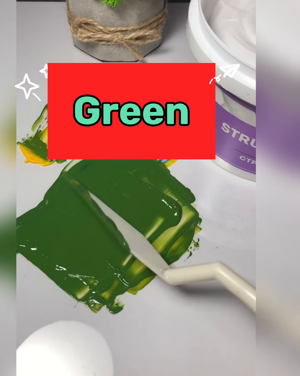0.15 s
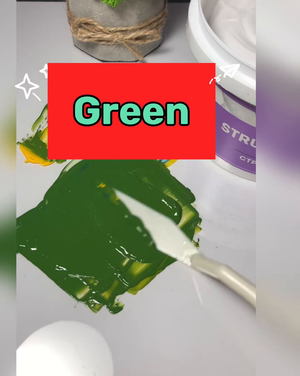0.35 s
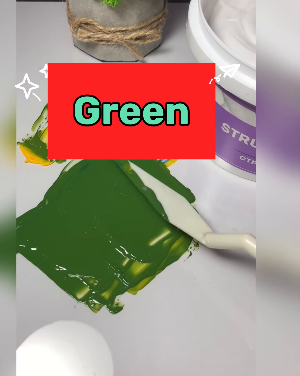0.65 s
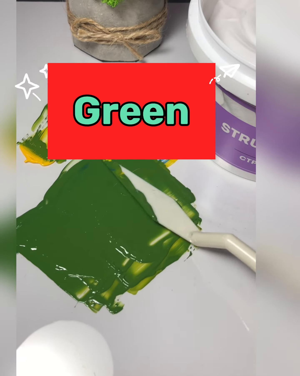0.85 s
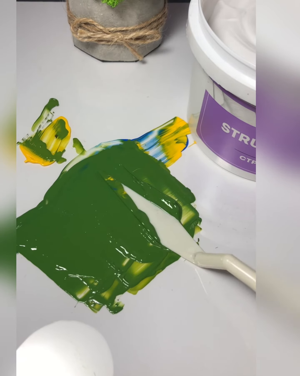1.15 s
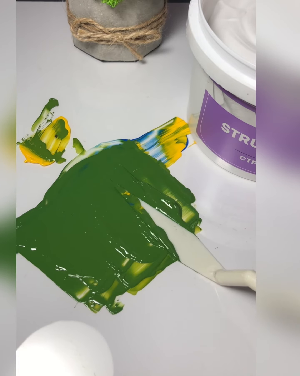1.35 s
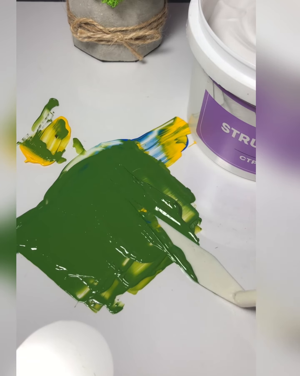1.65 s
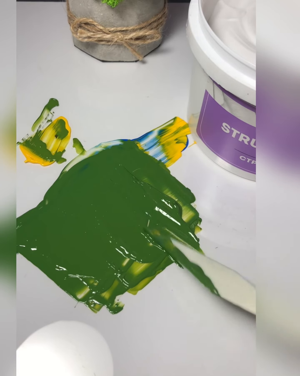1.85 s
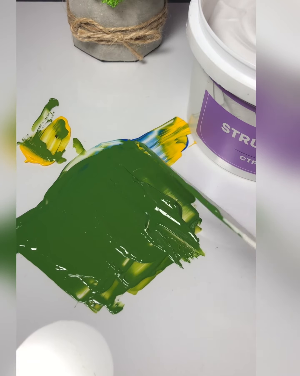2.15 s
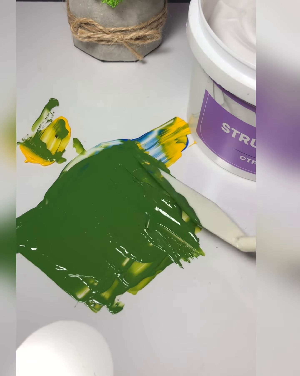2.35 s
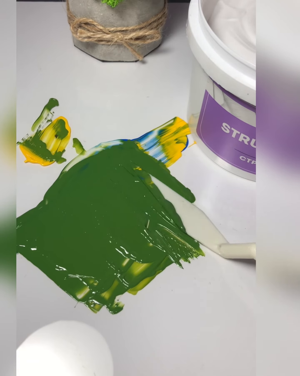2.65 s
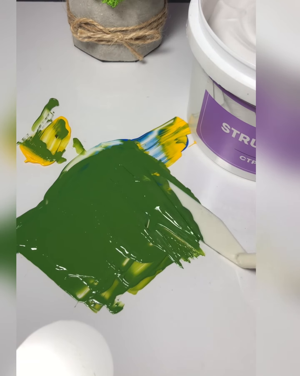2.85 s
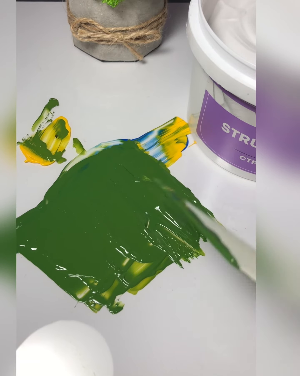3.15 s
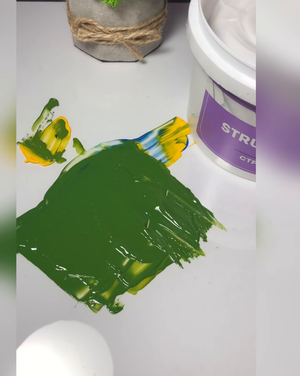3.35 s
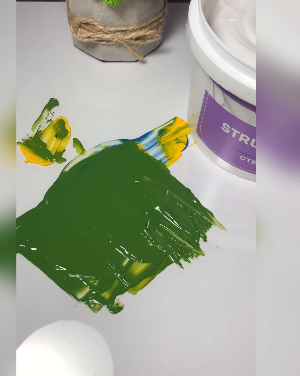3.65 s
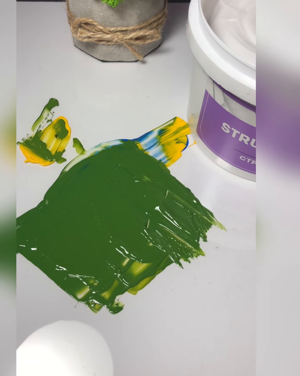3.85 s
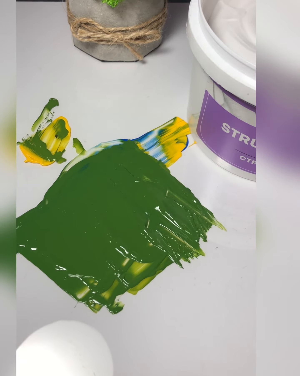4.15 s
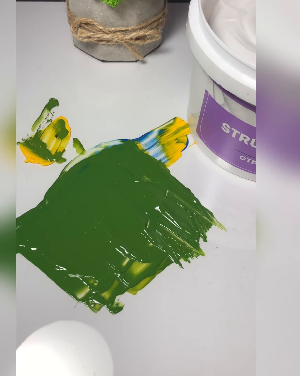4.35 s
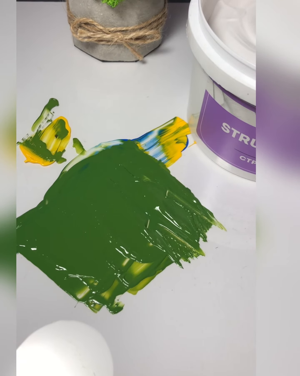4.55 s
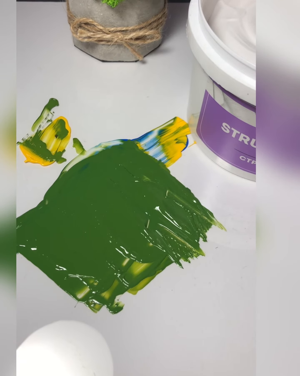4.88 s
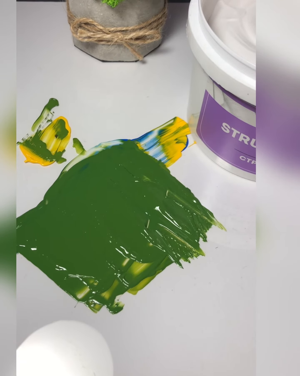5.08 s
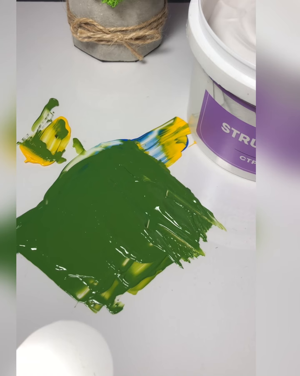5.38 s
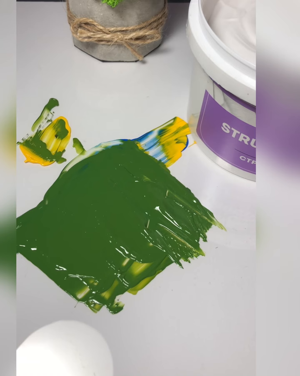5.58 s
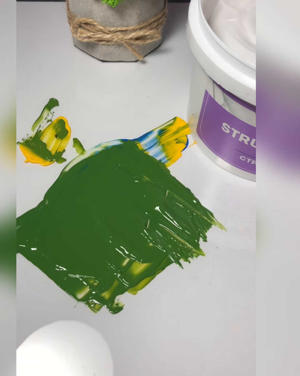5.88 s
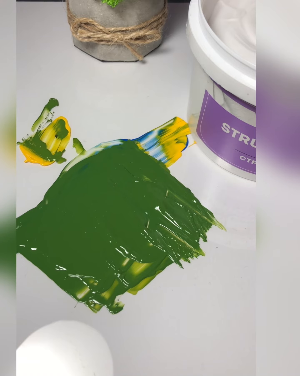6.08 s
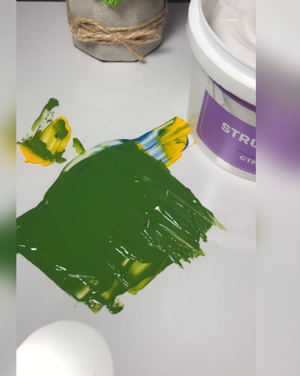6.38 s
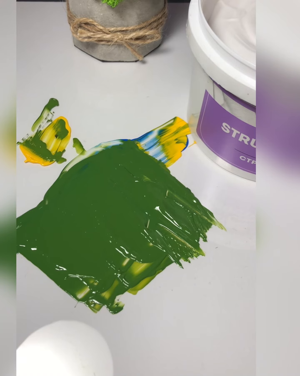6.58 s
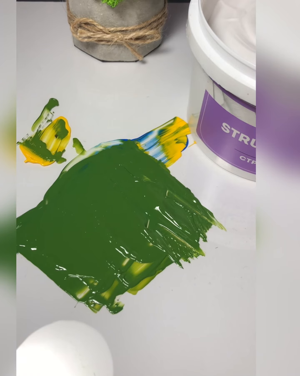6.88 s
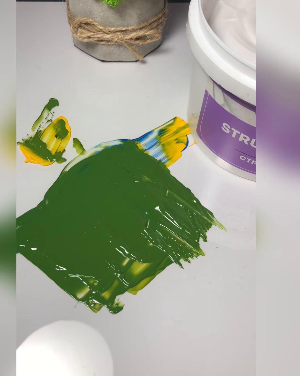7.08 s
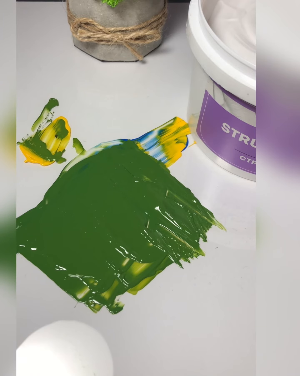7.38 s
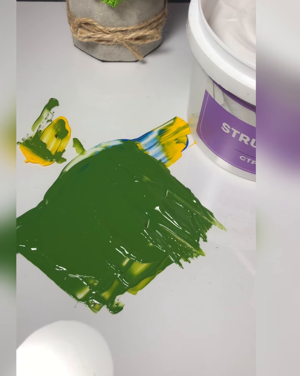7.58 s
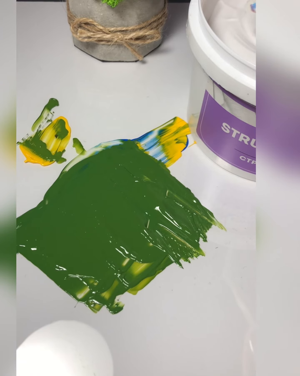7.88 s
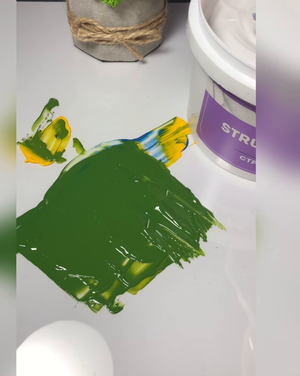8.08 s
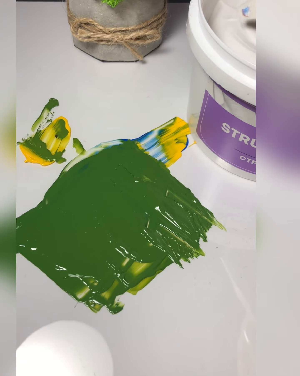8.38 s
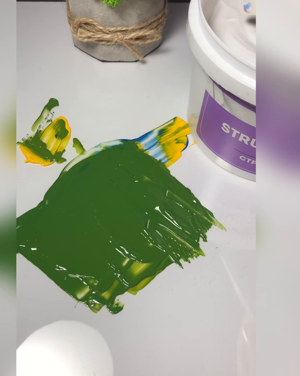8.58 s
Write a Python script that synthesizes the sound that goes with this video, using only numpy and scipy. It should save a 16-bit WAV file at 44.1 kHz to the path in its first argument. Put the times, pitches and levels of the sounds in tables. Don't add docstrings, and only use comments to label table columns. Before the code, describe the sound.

Close to the microphone, a flexible plastic blade skates over a smooth tabletop, hissing thinly and ticking as wet paint lets go. Just past the middle, the tool lands with a bright double clack, followed by small clicks, hollow tub knocks, low table thuds and brief rubbery scrapes. The end is nearly still, with soft brushes over room rumble, faint machine drone and steady hiss.

```python
import sys
import numpy as np
from scipy import signal
from scipy.fft import rfft, irfft, next_fast_len
from scipy.io import wavfile

SR = 44100
rng = np.random.default_rng(int(sys.argv[2]) if len(sys.argv) > 2 else 0)


def rack_gain(trim_db):
    fader = np.asarray(trim_db, float)
    return 10 ** (fader / 20)


def master(y):
    cut = np.clip(np.atleast_2d(y).T, -1, 1)
    pcm = np.round(cut * 32767)
    wavfile.write(sys.argv[1], SR, pcm.astype(np.int16))


N = 384983


def unit(x):
    return x / np.sqrt(np.mean(x ** 2) + 1e-20)


def along(points, hz):
    f, v = np.transpose(points)
    return np.interp(np.log(hz + 1), np.log(f + 1), v)


def curves(rows):
    s, *cols = np.transpose(rows)
    return [np.interp(np.arange(N) / SR, s, c) for c in cols]


def wobble(rate):
    knots = rng.standard_normal(int(N * rate / SR) + 4)
    return np.interp(np.arange(N) * rate / SR, np.arange(len(knots)), knots)


def filtered(x, response):
    m = next_fast_len(N + 8192, real=True)
    return irfft(rfft(x, m) * response(np.fft.rfftfreq(m, 1 / SR)), m)[..., :N]


def body(modes):
    def response(f):
        total = 0
        for k, (center, width, db) in enumerate(modes):
            damping = 1j * f * width
            total = total + (-1) ** k * rack_gain(db) * damping / (center * center - f * f + damping)
        return total
    return response


def friction(gain, modes, grit_db, rate, count=1):
    grip = unit(rack_gain(grit_db * wobble(rate)) * rng.standard_normal(N))
    ring = body(modes)
    power = np.mean(np.abs(ring(np.arange(0, SR / 2, 2.))) ** (2 * count))
    return filtered(gain * grip, lambda hz: ring(hz) ** count) / np.sqrt(power)


def swells(rows, rise_db, fall_db):
    fade_s = 0.0086
    gains = np.zeros((len(rows[0]) - 3, N))
    for start, top, end, db, *tone_db in rows:
        span = np.arange(round(start * SR), round(end * SR))
        t = span / SR
        shape = rack_gain(np.interp(t, [start, top, end], [-rise_db, 0, -fall_db]))
        shape = shape * np.clip((t - start) / min(fade_s, top - start), 0, 1)
        levels_db = [db] + [db + d for d in tone_db]
        gains[:, span] += rack_gain(levels_db)[:, None] * shape
    return gains


def blows(rows, contact_s):
    out, t = np.zeros((len(rows[0]) - 1, N + SR)), np.arange(256) / SR
    for s, *levels_db in rows:
        burst = (1 + 0.53 * rng.standard_normal(len(t))) * np.exp(-t / contact_s)
        i = round(s * SR)
        out[:, i:i + len(t)] += rack_gain(levels_db)[:, None] * burst / np.linalg.norm(burst)
    return out[:, :N]


def blade_strokes():
    # start, hardest moment and end in seconds, pressure in dB, edge fizz over the flex in dB.
    smears = [(.335, .35, 0.4, -73.5, 2), (.37, .422, 0.46, -76, 3), (.96, 1.0, 1.06, -75.5, -8),
              (1.29, 1.306, 2.1, -80, -8), (1.56, 1.678, 1.68, -68.5, -10), (1.64, 1.71, 1.9, -74.5, 8.5),
              (1.73, 1.745, 1.76, -64, -10), (1.74, 1.794, 1.804, -62, 5.5), (1.81, 1.84, 1.85, -75, -6),
              (2.66, 2.68, 2.98, -76, -7), (2.78, 2.824, 2.9, -69, -12), (2.88, 2.96, 2.97, -68.5, -3),
              (2.95, 3.014, 3.087, -61.5, 6), (3.02, 3.052, 3.057, -72, 5), (3.235, 3.256, 3.52, -76, -4),
              (3.5, 3.54, 3.7, -80, -2), (3.74, 3.784, 3.92, -78, -2), (4.85, 4.856, 5.1, -77.5, -3),
              (5.03, 5.035, 5.4, -80, -10), (5.14, 5.26, 6.3, -76, -17), (7.3, 7.402, 7.55, -77, 0),
              (7.5, 7.6, 7.85, -86, 1.5), (8.2, 8.268, 8.4, -81, -13)]
    # resonance in Hz, width in Hz, level in dB.
    blade_modes = [(1190, 1200, -7), (2440, 500, -3), (3600, 500, 1), (5300, 400, 0.5), (7450, 1200, -5)]
    edge_modes = [(8650, 900, -3.5), (9800, 900, 0.5), (11750, 1410, 1.5), (13870, 1300, -3),
                  (15100, 800, -5)]
    flex, fizz = swells(smears, rise_db=13.5, fall_db=13)
    return friction(flex, blade_modes, grit_db=0.5, rate=230) + friction(fizz, edge_modes, grit_db=2.5, rate=170)


def paint_ticks():
    # time in seconds, peak in dB, pitch in Hz, time to fall 60 dB in seconds.
    releases = [(0.3422, -57, 3790, 0.006), (1.7414, -48, 11800, 0.0061), (1.7514, -46, 12700, 0.006),
                (1.7605, -42, 11800, 0.006), (1.825, -48, 13900, 0.006), (1.8362, -48, 4730, 0.0074),
                (2.6854, -36.5, 12000, 0.0044), (3.0064, -39, 11400, 0.0066), (3.0684, -62, 2600, 0.006),
                (3.254, -59.5, 5480, 0.035), (3.827, -60, 4700, 0.019)]
    out, t = np.zeros(N + SR), np.arange(2048) / SR
    for s, db, hz, t60 in releases:
        crack = np.diff(rng.standard_normal(len(t) + 1)) * 0.58
        tone = 0.63 * np.sin(2 * np.pi * hz * t)
        i = round(s * SR)
        out[i:i + len(t)] += rack_gain(db - 60 * t / t60) * (crack + tone)
    return out[:N]


def knife_drop():
    # time in seconds, strength in dB, middle over the handle in dB, tip over the handle in dB.
    light_taps = [(4.8467, -54.5, -1.5, 10.5), (5.0256, -56, -4.5, 6.5), (5.2713, -43.5, -5, -14),
                  (5.282, -38, -13, -19), (5.849, -42, -18, -30), (5.905, -57, -2, -15),
                  (5.9582, -63, 4, -6), (6.283, -66, 7, 14.5), (6.325, -56.5, 12, 3), (6.431, -59.5, 8, 1),
                  (6.5127, -53, -4, -8), (6.5617, -32.5, -4, -13.5), (6.7612, -64, -2, -3),
                  (6.775, -61, 1.5, 7)]
    landings = [
        (5.2858, -13.5, 0.1, -25),
        (5.3193, -18.5, 6.5, -3),
    ]
    # resonance in Hz, width in Hz, level in dB.
    low_modes = [(150, 196, -20), (374.4, 200, -9), (634, 200, -15.5), (830, 252.5, 6.5), (1396, 450, -6),
                 (1912, 500, -1.5), (2620, 401, 5)]
    mid_modes = [(2060, 500, -4.5), (3174, 400, -2), (3702, 360, 2.5), (4500, 500, -3.5), (5030, 700, -4)]
    high_modes = [(4743, 640, -1.5), (5700, 500, -3), (5932, 400, -4.5), (6966, 490, -2.5), (7550, 290, -2),
                  (8394, 600, -5), (9400, 900, -8), (11000, 1100, -14.5), (13500, 2000, -23)]
    # pitch in Hz, level in dB, time to fall 60 dB in seconds.
    ringing = [(860, -1.5, 0.079), (1332, -2.5, .1), (1600, -1.5, 0.077), (1820, -8, 0.065),
               (2585, -.5, 0.2093), (3050, -4, .12), (3330, -7, 0.092), (3720, -4, 0.12),
               (5040, -8.5, 0.089)]
    rattles = []
    for s, db, mid_db, tip_db in landings:
        for k in range(3):
            rattles.append((s + .0095 + .0043 * k, db - 15 - 6 * k, mid_db, tip_db))
    contacts = [(s, db, db + mid_db, db + tip_db) for s, db, mid_db, tip_db in light_taps + landings + rattles]
    low, mid, high = rack_gain(17.5) * blows(contacts, contact_s=.00006)
    knock = filtered(low, body(low_modes))
    knock = knock + rack_gain(5) * filtered(mid, body(mid_modes))
    knock = knock + rack_gain(6.5) * filtered(high, body(high_modes))
    thin = [(hz, 2.07 / t60, db + 20 * np.log10(t60)) for hz, db, t60 in ringing]
    return knock + rack_gain(17.0) * filtered(low + mid, body(thin))


def rim_catches():
    # start, hardest moment and end in seconds, pressure in dB, pitch at the start in Hz.
    grabs = [(5.478, 5.5, 5.53, -62, 920), (5.56, 5.578, 5.59, -63, 860), (5.858, 5.87, 5.89, -58, 1080),
             (6.284, 6.295, 6.325, -49, 730), (6.375, 6.392, 6.438, -51, 890),
             (6.514, 6.545, 6.556, -47, 1010), (6.555, 6.564, 6.59, -47, 1110),
             (6.797, 6.83, 6.9, -52, 840), (6.905, 6.93, 6.942, -57, 780)]
    sag_per_s = 1.3
    stutter_per_s = 150
    hz, t = np.zeros(N), np.arange(N) / SR
    for start, _, _, _, first_hz in grabs:
        i = round(start * SR)
        hz[i:] = first_hz * (1 - sag_per_s * (t[i:] - start))
    gain, = swells([row[:4] for row in grabs], rise_db=2, fall_db=7.5)
    stutter = rack_gain(5 * wobble(stutter_per_s))
    phase = 2 * np.pi * np.cumsum(hz) / SR + 1.1 * wobble(stutter_per_s)
    return np.sqrt(2) * gain * stutter * np.sin(phase)


def pot():
    # start, hardest moment and end in seconds, pressure in dB, walls over the cavity in dB. A row
    scrapes = [(5.488, 5.494, 5.6, -67, 9.5), (5.545, 5.578, 5.65, -65.5, 1),
               (5.606, 5.612, 5.635, -66.5, 10.5), (5.62, 5.648, 5.63, -57.5, -3),
               (5.822, 5.848, 5.95, -47.5, -9), (5.895, 5.906, 5.89, -59, 3), (6.28, 6.292, 6.34, -53.5, 0),
               (6.33, 6.35, 6.37, -69, 8), (6.37, 6.4, 6.45, -58, 5.5), (6.508, 6.514, 6.63, -48.5, 6),
               (6.535, 6.564, 6.64, -52, 5), (6.59, 6.605, 6.63, -67.5, 6), (6.76, 6.785, 6.82, -57.5, 3.5),
               (6.79, 6.8, 6.87, -59, 9), (6.81, 6.85, 6.94, -62.5, 6), (6.87, 6.925, 6.941, -69, 4)]
    # start, hardest moment and end in seconds, push in dB. A row that ends
    pushes = [(5.53, 5.58, 5.3, -62), (5.59, 5.688, 5.8, -59), (5.81, 5.847, 5.91, -53),
              (5.89, 5.905, 5.7, -54), (6.275, 6.292, 6.36, -52), (6.505, 6.56, 6.64, -53.5),
              (6.755, 6.77, 6.97, -60)]
    # time in seconds, cavity in dB, wall tones in dB.
    hits = [(5.4905, -49, -47.5), (5.575, -47, -52), (5.6105, -47, -38.5), (5.684, -63, -46.5),
            (5.8495, -29.5, -30), (5.9045, -37.5, -39), (6.2905, -34, -42), (6.5125, -41, -29),
            (6.543, -39, -24), (6.574, -34, -40), (6.766, -42.5, -55), (6.799, -45, -35)]
    # resonance in Hz, width in Hz, level in dB.
    cavity_modes = [(744, 128, 0)]
    rim_modes = [(870, 29, -2), (1050, 82, -4)]
    wall_modes = [(1303, 100, 3.5), (1594, 80, 1.5), (1800, 230, -7), (2680, 420, -18), (3500, 1100, -18.5)]
    thud_modes = [(136, 53, -4.5), (366, 86, 1.5)]
    cavity, walls = swells(scrapes, rise_db=5, fall_db=20.5)
    thud, = swells(pushes, rise_db=3, fall_db=11.5)
    drag = friction(rack_gain(0.5) * cavity, cavity_modes, grit_db=3.5, rate=140, count=2) + rim_catches()
    drag = drag + friction(rack_gain(-3.0) * walls, wall_modes, grit_db=3, rate=160)
    drag = drag + friction(thud, thud_modes, grit_db=0.5, rate=62)
    plain, tone = blows(hits, contact_s=.00015)
    knocks = rack_gain(24) * filtered(plain, body(cavity_modes + rim_modes))
    knocks = knocks + rack_gain(16.5) * filtered(tone, body(wall_modes))
    soft_hz = 5000
    return signal.sosfilt(signal.butter(2, soft_hz, fs=SR, output="sos"), drag + knocks)


def table_echoes(x):
    def late(s):
        return np.pad(x, (round(s * SR), 0))[:N]
    return x + .45 * late(0.00068) + 0.3 * late(0.00129) - 0.18 * late(.0021) + .25 * late(.0034)


def room(x):
    # frequency in Hz, time to fall 60 dB in seconds.
    decay = [(400, 0.42), (1000, 0.2025), (2800, 0.25), (7000, .16), (14000, 0.085)]
    hz, t, z = signal.stft(rng.standard_normal(SR // 2), SR, nperseg=256)
    tail = signal.istft(z * rack_gain(-60 * t / along(decay, hz)[:, None]), SR, nperseg=256)[1]
    return signal.fftconvolve(np.pad(x, (90, 0)), tail / np.linalg.norm(tail))[:N]


def hum(rows, order, upper_db, unsteady_db):
    hz, low_db = curves(rows)
    t = np.arange(N) / SR
    heard = np.clip(np.minimum(t - rows[0][0], rows[-1][0] - t) / .05 + .5, 0, 1)
    turn = 2 * np.pi * np.cumsum(hz) / SR
    low = rack_gain(low_db + unsteady_db * wobble(7)) * np.sin(turn)
    high = rack_gain(low_db + upper_db + 4 * wobble(4)) * np.sin(order * turn + 0.5 * wobble(5.2))
    return np.sqrt(2) * heard * (low + high)


def engines():
    # time in seconds, firing pitch in Hz, level in dB.
    first = [(0.0, 101.5, -54), (1.16, 100.4, -56.5), (1.75, 103, -53.5), (1.89, 104, -66.5),
             (2.13, 104.7, -53.5), (2.3, 106.9, -62.5), (2.6, 109, -60), (2.89, 110.6, -80),
             (3.2, 114.5, -65)]
    second = [(0.0, 73, -61), (0.51, 73.3, -72.5), (1.58, 75.9, -70), (3.2, 82, -73.5), (3.45, 87.1, -66),
              (4.17, 92.2, -56.5), (4.52, 94.1, -66), (5.11, 94.16, -64.5), (5.69, 93.1, -68),
              (6.67, 86.2, -66.5), (7.0, 85.6, -79)]
    return hum(first, order=2, upper_db=-19, unsteady_db=1.5) + hum(second, order=2, upper_db=-7.5, unsteady_db=2.5)


def machine_drone():
    # time in seconds, pitch in Hz, level in dB.
    glide = [(1.8, 48.4, -79), (2.94, 51.6, -78), (6.1, 44.33, -76), (8.13, 38.36, -74.5),
             (8.73, 37.85, -77)]
    return hum(glide, order=3, upper_db=-5, unsteady_db=2.0)


def traffic(busy_db):
    # resonance in Hz, width in Hz, level in dB.
    roar = [(95, 63, 0)]
    return friction(rack_gain(-67 + 0.41 * busy_db), roar, grit_db=3.5, rate=3.3, count=2)


def room_rumble(busy_db):
    # frequency in Hz, level in dB per Hz.
    spectrum = [(15, -33), (25, -19), (45, -13), (70, -18.5), (110, -10), (170, -14), (260, -25.5),
                (330, -20.5), (420, -27), (700, -29.5), (1500, -48.5), (4000, -90.5)]
    # resonance in Hz, width in Hz, level in dB.
    waves = [(138, 5.6, -1.5), (298.4, 7.6, 16.5), (432.2, 16, 6), (502, 17, 6.5)]
    strongest = [(217.5, 11, 0)]

    def boom(hz):
        return rack_gain(along(spectrum, hz)) * (1 + np.abs(body(waves)(hz)))
    sway_db = 0.9 * wobble(3.8)
    rumble = rack_gain(-64 + busy_db + sway_db) * unit(filtered(rng.standard_normal(N), boom))
    return rumble + friction(rack_gain(-63 + 0.39 * busy_db), strongest, grit_db=-0.7, rate=5)


def microphone_hiss():
    # frequency in Hz, level in dB per Hz.
    spectrum = [(300, -16), (800, 2.5), (1500, -2.5), (2300, 0), (3500, -5), (8000, -7.5), (15000, -11),
                (20000, -14)]
    return rack_gain(-75) * unit(filtered(rng.standard_normal(N), lambda hz: rack_gain(along(spectrum, hz))))


def background():
    # time in seconds, level over its usual in dB.
    street = [(0, -1.5), (1.1, -0.5), (1.8, 2.5), (3.4, 2), (4.1, 2), (4.9, 1.5), (6.3, 1), (7.6, -2),
              (8.1, 0.5), (8.73, -1.5)]
    busy_db, = curves(street)
    return engines() + machine_drone() + traffic(busy_db) + room_rumble(busy_db) + microphone_hiss()


def scene():
    fall = knife_drop()
    near = blade_strokes() + paint_ticks() + pot()
    reverb = room(rack_gain(-9.5) * fall + rack_gain(-18.5) * near)
    return (table_echoes(fall) + near + reverb + background())[None]


def top_cut(x):
    return signal.sosfilt(signal.butter(12, 16650, fs=SR, output="sos"), x)


def record(dry):
    # frequency in Hz, gain in dB.
    band_limit = [(15700, 0), (15850, -22), (16620, -22), (16660, -120)]
    mix = filtered(dry, lambda hz: rack_gain(along(band_limit, hz)))
    return top_cut(mix)


dry = scene()
out = record(dry)
master(out)
```